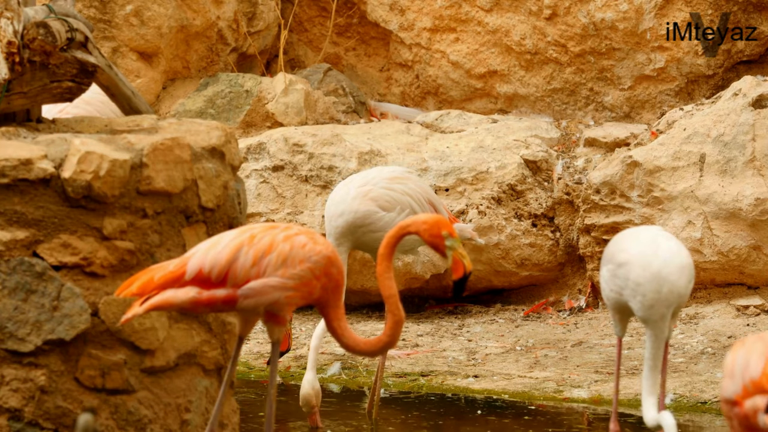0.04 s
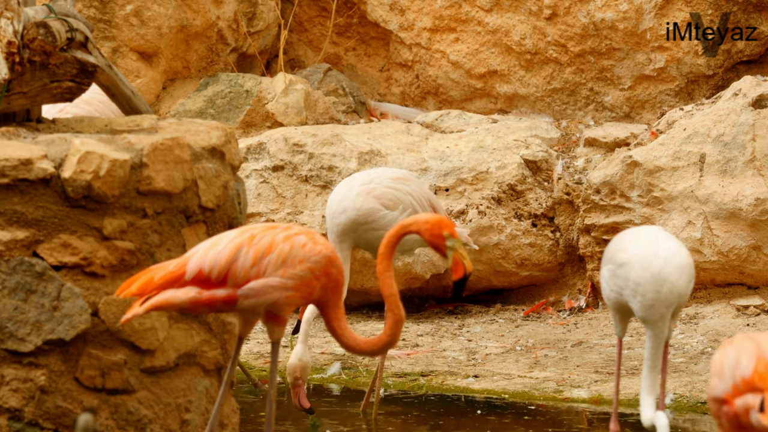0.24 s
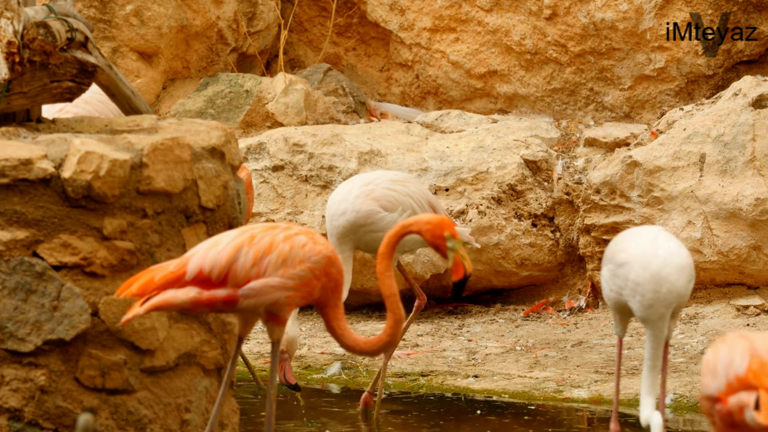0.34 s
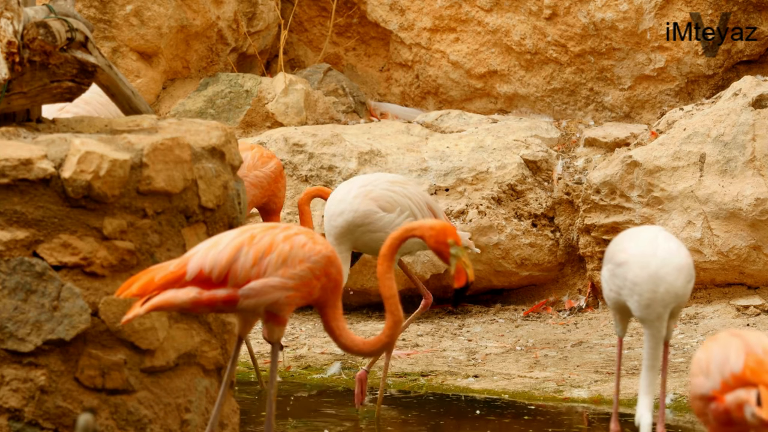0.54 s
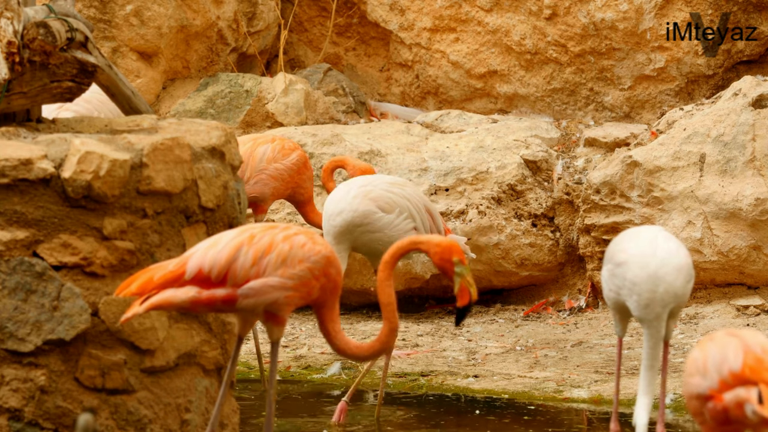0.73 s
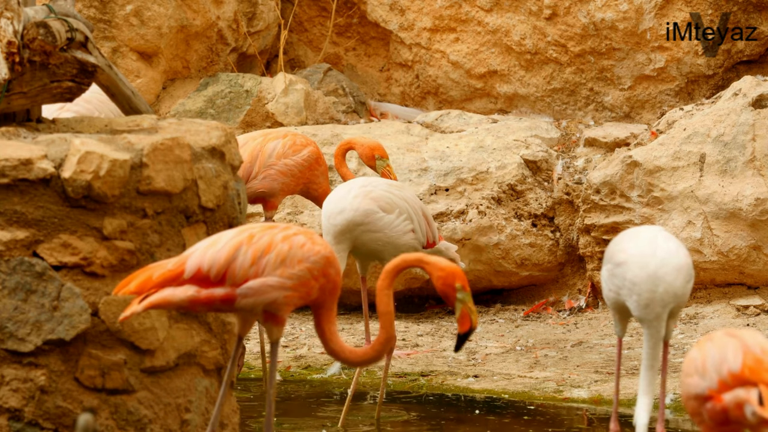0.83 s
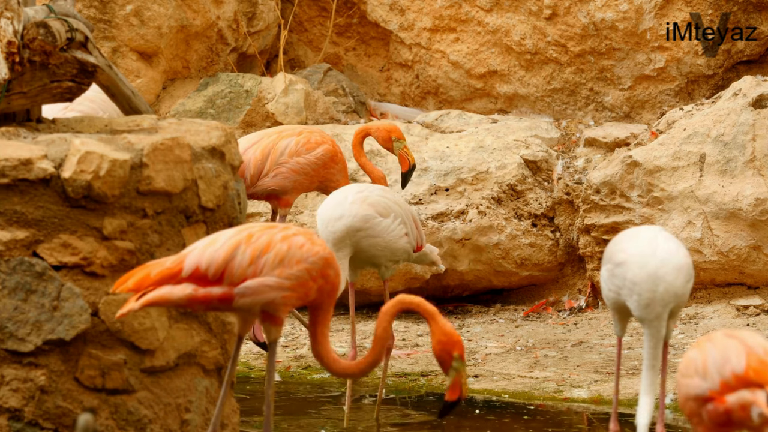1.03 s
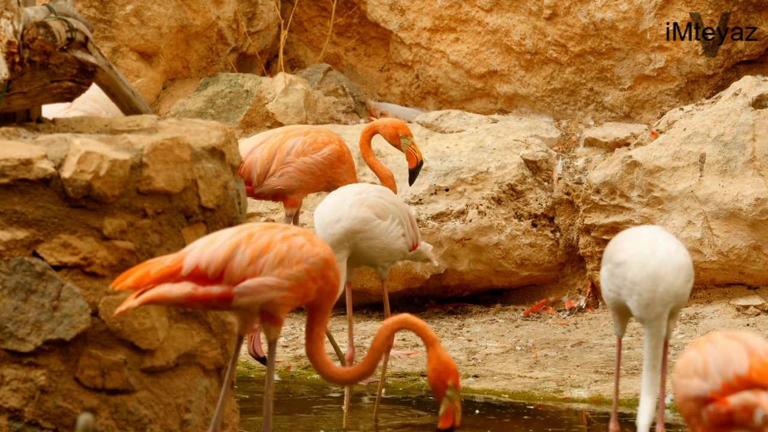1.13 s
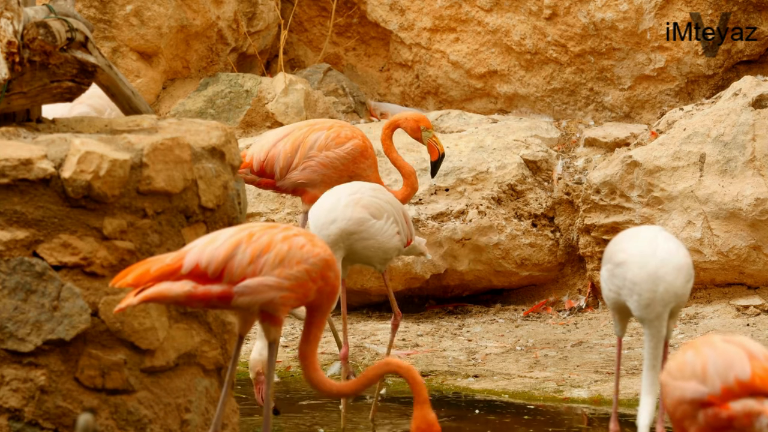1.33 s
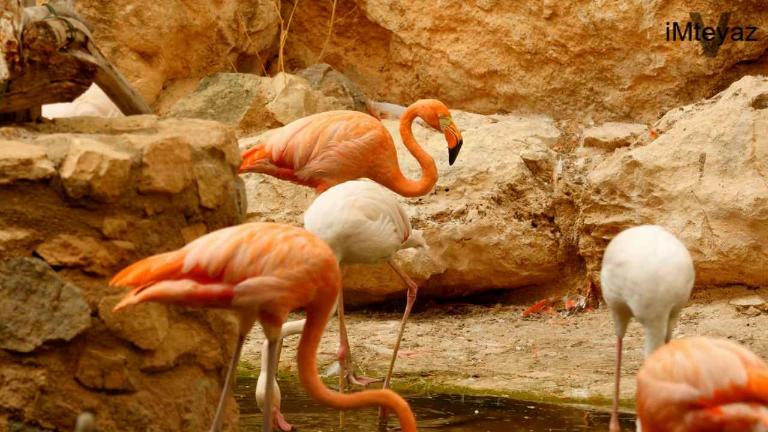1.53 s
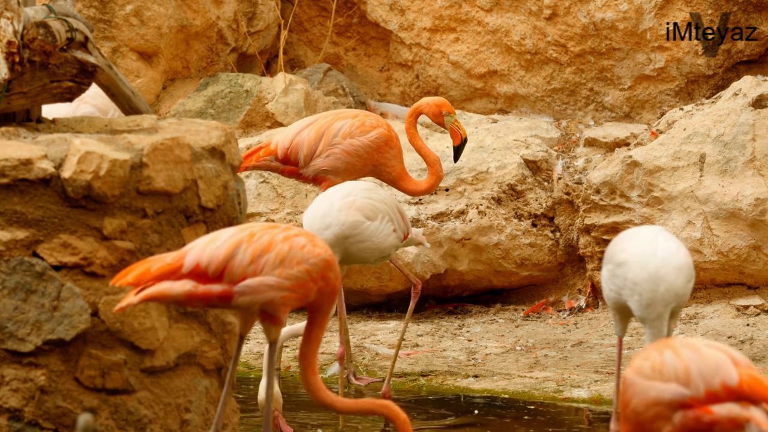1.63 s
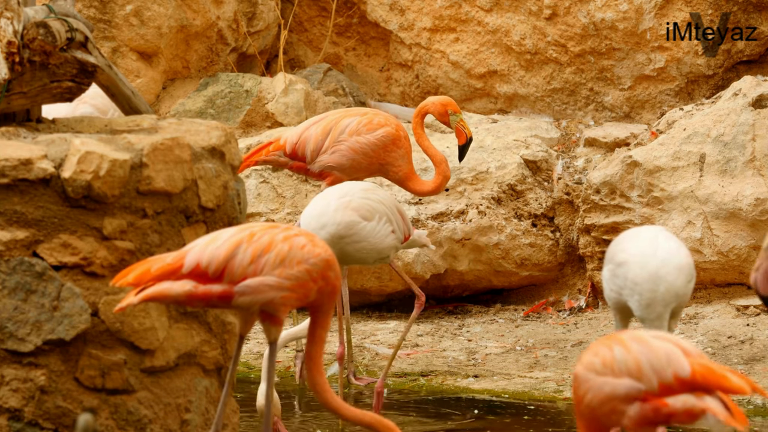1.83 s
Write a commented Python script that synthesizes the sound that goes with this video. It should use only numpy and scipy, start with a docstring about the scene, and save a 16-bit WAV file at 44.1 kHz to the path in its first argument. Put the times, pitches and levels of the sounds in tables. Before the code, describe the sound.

A flamingo gives short raspy nasal honks, nearly four a second, echoing in a rocky enclosure.

```python
"""Short nasal honks, nearly four a second, from a flamingo in a rocky outdoor enclosure.
Each honk is a falling train of syrinx pulses that rings the long windpipe; breath noise roughens it.
Softer, duller grunts come in between, made by the same pulses through a different throat.
The rocks throw the calls back as an early echo and a diffuse tail.
Below lie steady air, a low rumble with two brief booms and a faint high whine, all shaped from noise or sines."""
import sys
import numpy as np
from scipy import signal
from scipy.fft import rfft, irfft
from scipy.io import wavfile

SR = 44100
rng = np.random.default_rng(int(sys.argv[2]) if len(sys.argv) > 2 else 0)


def pcm_store(signal):
    """Save signal as 16-bit PCM."""
    levels = np.round(np.clip(np.atleast_2d(signal), -1, 1) * 32767)
    wavfile.write(sys.argv[1], SR, levels.astype(np.int16).T)


N = 81585  # length of the scene in samples
LEAD = 8192  # samples before time zero, so that a call may already be under way

ONSET_DB, FADE_SHAPE = -4, 1.41  # level of a honk's first instant below its peak; curvature of the fade
TREBLE_HZ = 3400  # above this the treble slope of each honk acts
GRUNT_FALL_OCT_S, GRUNT_EDGE_S, GRUNT_ROUGH = 4, 0.0015, .6
SHIMMER_DB, JITTER, BREATH = 5, .13, .65  # at roughness 1: pulse level scatter, period scatter, air share
FALL_LIMIT_S, PUFF_DECAY_S = .045, .0005  # the pitch stops falling here; fade of each puff of air

SMEAR_S, SMEAR_STEP_HZ = 0.000412, 361  # random small delay per band, slightly smearing the direct sound
GROUND_S, GROUND_DB = .0076, -12  # first echo
PORTS_HZ, PORTS_WIDTH_HZ, PORTS_DB = 650, 870, -7.5  # band the two microphones hear partly out of phase
ENCLOSURE_BUILD_S = 0.0066  # time constant of the tail's build-up
AIR_DB = -39.5
WHINE_HZ, WHINE_WIDTH_HZ, WHINE_DB = 5347, 640, -44.5
BALANCE_DB = -.5  # left over right
TOP_HZ = 15600


def undb(db):
    """Decibels to gain."""
    return 10 ** (np.asarray(db) / 20)


def unit(x):
    """Scale to rms 1."""
    return x / np.sqrt(np.mean(x ** 2) + 1e-18)


def add(track, start, x):
    """Mix a sound into a track that begins a little before time zero."""
    i = max(LEAD + int(start * SR), 0)
    x = x[:len(track) - i]
    track[i:i + len(x)] += x


def freqs(size):
    """Frequencies of a spectrum in Hz, at least 1."""
    return np.maximum(np.fft.rfftfreq(size, 1 / SR), 1)


def resonance(f, hz, width):
    """Response of one resonance, gain 1 at its centre."""
    return 1 / (1 + 1j * (f * f - hz * hz) / (f * width))


def colour(x, points):
    """Shape a sound by (Hz, dB) points joined along log frequency."""
    hz, db = np.array(points).T
    gain = undb(np.interp(np.log(freqs(x.shape[-1])), np.log(hz), db))
    return irfft(rfft(x) * gain, x.shape[-1])


def ring(voice, tube):
    """Sound a voice through the response of a tube, scaled to rms gain 1 over the spectrum."""
    rung = irfft(rfft(voice, 2 * len(voice)) * tube)
    return rung / np.sqrt(np.mean(np.abs(tube) ** 2))


def honks(size=4096):
    """Each honk starts abruptly, swells and fades while its pulses ring the windpipe."""
    # Each row: start in seconds, peak in seconds after the start, fade in seconds, level in dB,
    # pitch in Hz, pitch fall in octaves per second, roughness 0-1, treble slope in dB per octave.
    honk_rows = [(-.085, 0.027, 0.028, -16, 686, 10.3, 0.58, -10),
                 (.204, 0.012, 0.019, -12, 705.4, 14, 0.31, -6.5),
                 (0.461, 0.022, 0.011, -13, 692, 14.3, 0.31, -4),
                 (0.7323, 0.022, .013, -14, 696, 10, 0.4, -8),
                 (1.0014, 0.011, 0.024, -13.5, 471.5, 5, .35, -10),
                 (1.2757, 0.028, 0.0073, -15.5, 479.8, 7.65, 0.42, -10),
                 (1.5553, 0.017, 0.012, -14, 500.1, 7, .35, -7.5)]
    # Stress on the six lowest windpipe resonances. Each row: one honk, six gains in dB.
    stress_rows = [(-1.7, -3, 3.5, 6.5, 1, -0.65), (-1, -3.5, 4.5, 6, 0, -1.2), (1.5, 0, 3, 6, 3, 0.47),
                   (2.8, 1.5, 1.5, 10, 5, 0.91), (-0.44, 1, 2.5, 4.5, 4, -0.43), (3, 4.5, 7, 7, 3.5, 1.5),
                   (-0.09, 1, 3.5, 7, 3.5, 1.4)]
    # Windpipe resonances. Each row: centre in Hz, width in Hz, level in dB.
    windpipe = [(503, 194, -13), (1414, 560, -2), (2026, 139, 3.5), (2525, 335, -1), (2985, 560, 3.5),
                (3775, 860, 3), (4342, 546, 1.5), (4915, 395, -2), (6150, 810, -12), (9580, 1400, -20.5),
                (12600, 1100, -63)]
    track = np.zeros(LEAD + N)
    t, f = np.arange(size) / SR, freqs(2 * size)
    for (start, peak, fade, db, pitch, fall, rough, treble_db), stress in zip(honk_rows, stress_rows):
        extra = list(stress) + [0] * len(windpipe)  # no stress on the higher resonances
        pipe = sum(undb(g + e) * resonance(f, hz, w) ** 2 for (hz, w, g), e in zip(windpipe, extra))
        pipe = pipe * undb(treble_db * np.log2(np.hypot(1, f / TREBLE_HZ)))
        swell = undb(ONSET_DB * np.clip(1 - t / peak, 0, 1) ** 2)
        fading = np.exp(-(np.maximum(t - peak, 0) / fade) ** FADE_SHAPE)
        voice = swell * fading * syrinx(t, pitch, fall, rough)
        add(track, start, undb(db) * ring(voice, pipe))
    return track


def syrinx(t, pitch, fall, rough):
    """Uneven pulses on a falling pitch, each followed by a puff of air."""
    pulses, at = np.zeros(len(t)), .0007  # first pulse in seconds
    for late, loud in rng.standard_normal((64, 2)):
        d = (t - at) * SR  # distance from the pulse in samples, so it may fall between them
        pulses += undb(SHIMMER_DB * rough * loud) * np.sinc(d) * np.exp(-(d / 10) ** 2)
        period = 2 ** (fall * min(at, FALL_LIMIT_S)) / pitch
        at += period * max(1 + JITTER * rough * late, .5)
    puffs = signal.lfilter([1], [1, -np.exp(-1 / (PUFF_DECAY_S * SR))], np.abs(pulses))
    air = puffs * rng.standard_normal(len(t))
    return unit(pulses) + BREATH * rough * unit(air)


def grunts(size=4096):
    """Short, dull, rough calls from the flock: syrinx pulses ringing a throat."""
    # Each row: start in seconds, length in seconds, level in dB, pitch in Hz,
    # factor on the throat's resonance frequencies.
    grunt_rows = [(0.584, 0.062, -39.5, 473, 1.01), (0.674, 0.052, -41.5, 400.2, 1.087),
                  (0.985, 0.056, -34.5, 449.5, 0.94), (1.249, 0.022, -28.5, 531, 1.11),
                  (1.318, 0.028, -33.5, 530, 1.04), (1.527, 0.027, -32.5, 563, 1),
                  (1.597, 0.0455, -39.5, 468.4, .92)]
    # Throat resonances. Each row: centre in Hz before that factor, width in Hz, level in dB.
    throat_rows = [(929, 160, -3), (1081, 294, 4.5), (1389, 133, 0), (2220, 560, -5.5), (4540, 1200, -13.5)]
    track = np.zeros(LEAD + N)
    t, f = np.arange(size) / SR, freqs(2 * size)
    for start, length, db, pitch, scale in grunt_rows:
        throat = sum(undb(g) * resonance(f, hz * scale, w) ** 2 for hz, w, g in throat_rows)
        effort = np.clip(np.minimum(t, length - t) / GRUNT_EDGE_S, 0, 1)
        voice = effort * syrinx(t, pitch, GRUNT_FALL_OCT_S, GRUNT_ROUGH)
        add(track, start, undb(db) * ring(voice, throat))
    return track


def near_path(x):
    """Slightly smeared direct sound and its first echo, as the two microphones receive it."""
    f = freqs(len(x))
    delay = SMEAR_S * np.interp(f / SMEAR_STEP_HZ, np.arange(256), rng.exponential(size=256))
    direct = np.exp(-2j * np.pi * np.cumsum(delay) * SR / len(x))  # phase is delay summed over frequency
    echo = undb(GROUND_DB) * np.exp(-2j * np.pi * f * GROUND_S)
    ports = 1j * undb(PORTS_DB) * np.abs(resonance(f, PORTS_HZ, PORTS_WIDTH_HZ))
    return irfft(rfft(x) * (direct + echo) * np.array([1 + ports, 1 - ports]), len(x))


def rock_walls(x, size=32768):
    """A diffuse tail of decaying noise bands that lasts longest in the middle of the spectrum."""
    # Reverberation bands. Each row: centre in Hz, level in dB, decay by 60 dB in seconds,
    # side over mid as a ratio.
    enclosure = [(250, -0.5, 0.32, 0.51), (648, -5.5, .7, 0.62), (1160, -8.5, 0.98, 1.03),
                 (2420, -10, 0.57, 0.77), (4000, -9.5, 0.63, 0.48), (7200, -4, 0.32, 0.51),
                 (13000, -7, .35, .8)]
    t, f = np.arange(size) / SR, freqs(size)
    response, centres = 0, np.log([row[0] for row in enclosure])
    for share, (_, db, t60, width) in zip(np.eye(len(enclosure)), enclosure):
        band = np.sqrt(np.interp(np.log(f), centres, share))  # crossfades into its neighbours
        noise = irfft(rfft(stereo_noise(width, size)) * band)
        tail = np.exp(-np.log(1000) * t / t60) * (1 - np.exp(-t / ENCLOSURE_BUILD_S))
        response = response + undb(db) * noise * tail / np.linalg.norm(tail)
    return signal.fftconvolve(x[None], response, axes=1)[:, :len(x)]


def stereo_noise(width, size):
    """Left and right noise; width is side over mid."""
    mid, side = rng.standard_normal((2, size))
    return unit(np.array([mid + width * side, mid - width * side]))


def background():
    """Steady air, a rumble of changing level with brief sine booms, and a narrow band of high whine."""
    # Steady air. Each row: frequency in Hz, relative density in dB per Hz.
    air_colour = [(25, -17), (70, -12.5), (140, 3), (260, 1), (500, -1.5), (900, -1.5), (2000, -4),
                  (4300, -6.5), (6000, -25), (8000, -20), (15000, -66)]
    # Low rumble. Each row: frequency in Hz, relative density in dB per Hz.
    rumble_colour = [(40, -31), (90, -26), (130, -8), (240, 1.5), (330, 1.5), (480, -7), (900, -16),
                     (3000, -40)]
    # Rise and fall of the rumble. Each row: time in seconds, level in dB.
    rumble_level = [(0, -50.5), (.3, -44), (0.699, -42.5), (0.811, -41), (.9, -40.5), (1.02, -35.5),
                    (1.22, -41), (1.45, -39.5), (1.75, -39), (1.85, -44.5)]
    # Low booms. Each row: centre in seconds, half length in seconds, level in dB, pitch in Hz.
    boom_rows = [(0.809, 0.019, -33, 234), (1.16, 0.019, -35.5, 240)]
    t = np.arange(N) / SR
    air = undb(AIR_DB) * unit(colour(outdoor_noise(), air_colour))
    level = undb(np.interp(t, *np.array(rumble_level).T))
    rumble = level * unit(colour(outdoor_noise(), rumble_colour))
    booms = np.zeros(N)
    for at, half, db, hz in boom_rows:
        swell = np.exp(-((t - at) / half) ** 2)
        booms += undb(db) * swell * np.sin(2 * np.pi * hz * (t - at))
    whine = irfft(rfft(outdoor_noise()) * resonance(freqs(N), WHINE_HZ, WHINE_WIDTH_HZ) ** 2, N)
    return air + rumble + booms + undb(WHINE_DB) * unit(whine)


def outdoor_noise():
    """Stereo noise whose likeness between left and right changes with frequency."""
    # Width of the background. Each row: frequency in Hz, side over mid in dB.
    spread = [(60, 1), (130, -12), (260, -6), (600, 0.5), (1200, 4), (2500, 4), (5000, -6.5), (12000, 3)]
    mid, side = rng.standard_normal((2, N))
    side = colour(side, spread)
    return np.array([mid + side, mid - side])


def scene():
    """The birds in their enclosure over the background, all slightly to the right."""
    calls = honks() + grunts()
    heard = (near_path(calls) + rock_walls(calls))[:, LEAD:]
    balance = undb(np.array([[BALANCE_DB], [-BALANCE_DB]]) / 2)
    return (heard + background()) * balance


def record(dry):
    """The recorder cuts the top with a steep low-pass."""
    low_pass = signal.ellip(10, .2, 70, TOP_HZ, fs=SR, output="sos")
    return signal.sosfilt(low_pass, dry)


dry = scene()
out = record(dry)
pcm_store(out)
```